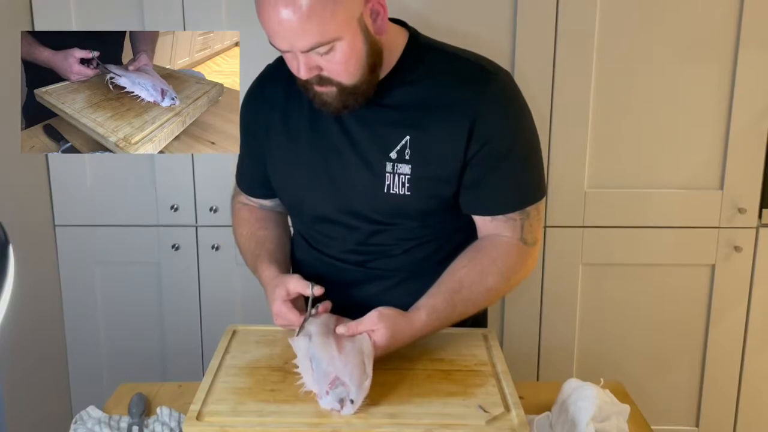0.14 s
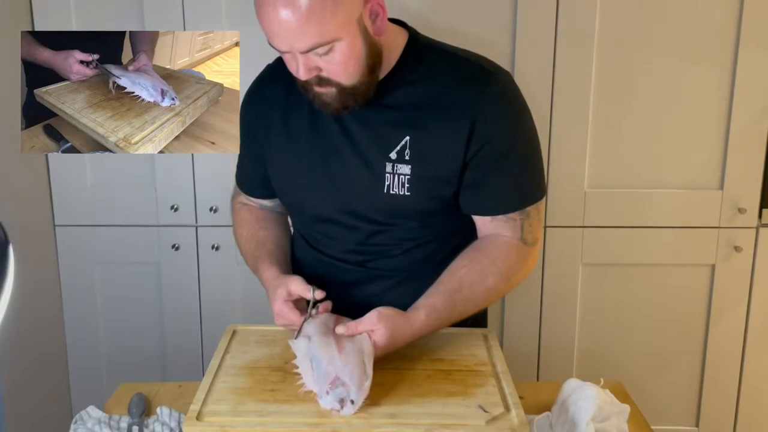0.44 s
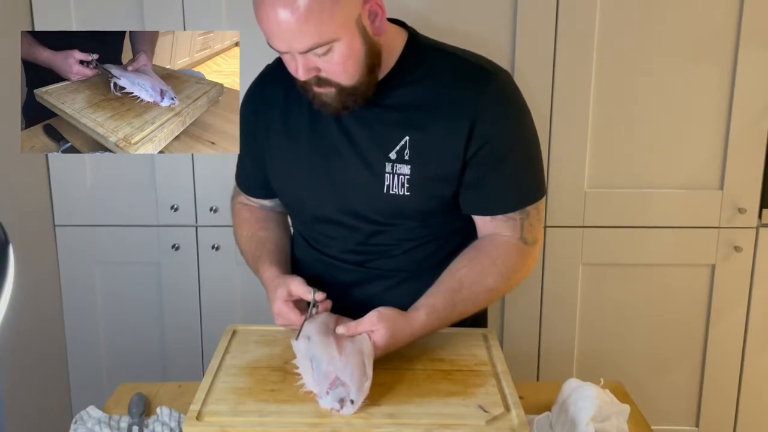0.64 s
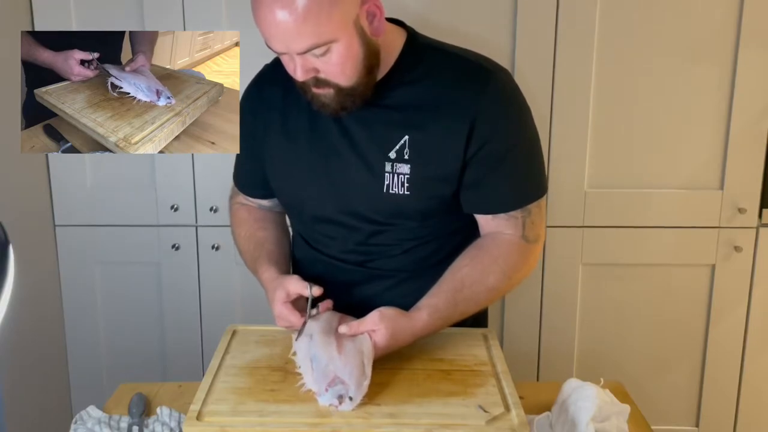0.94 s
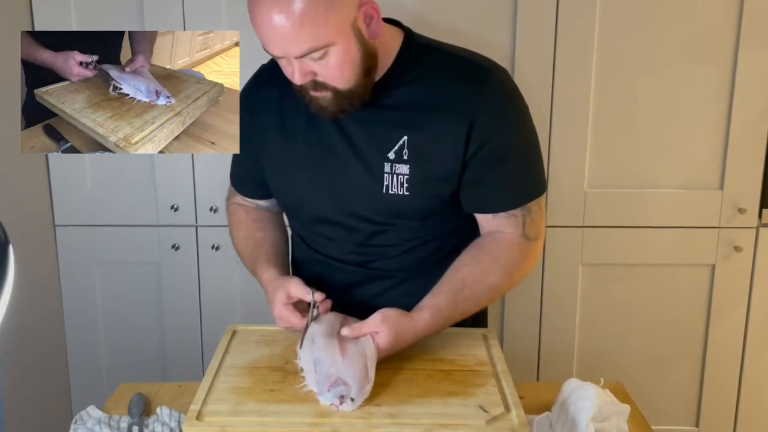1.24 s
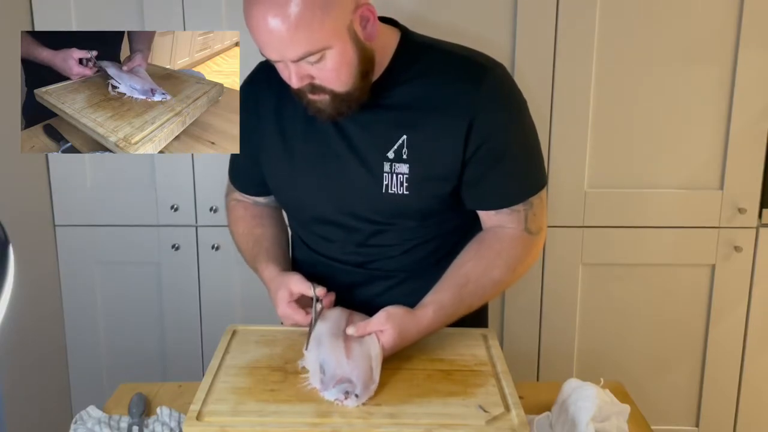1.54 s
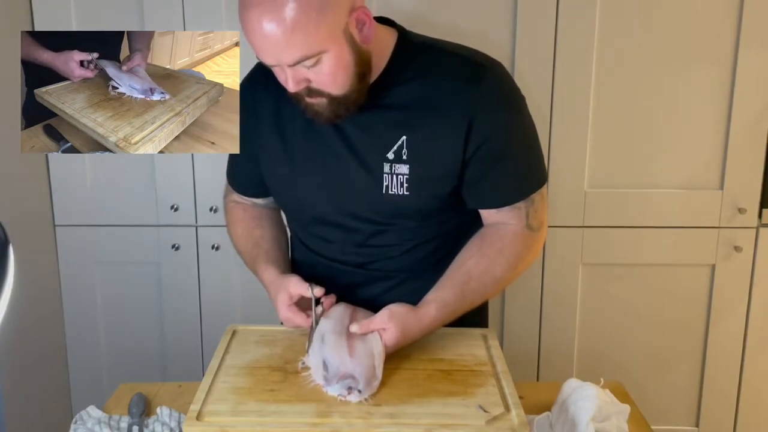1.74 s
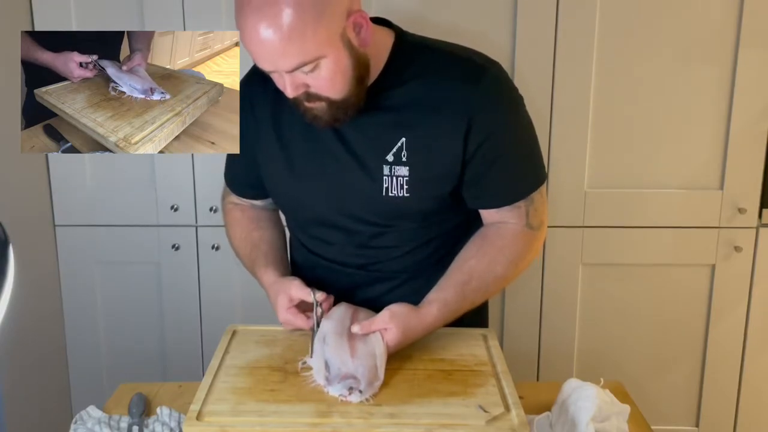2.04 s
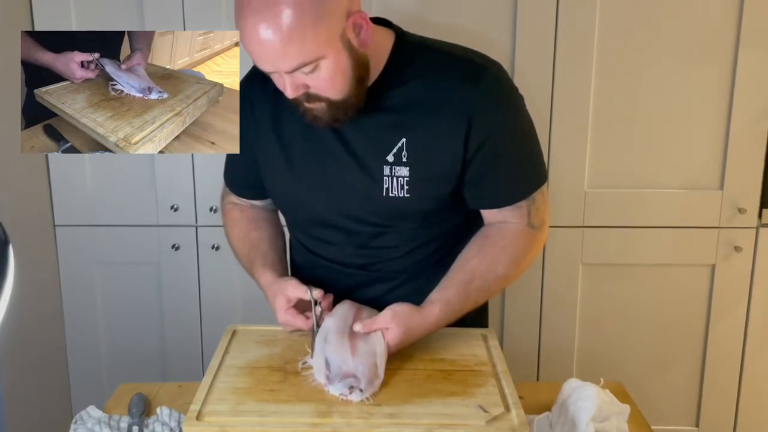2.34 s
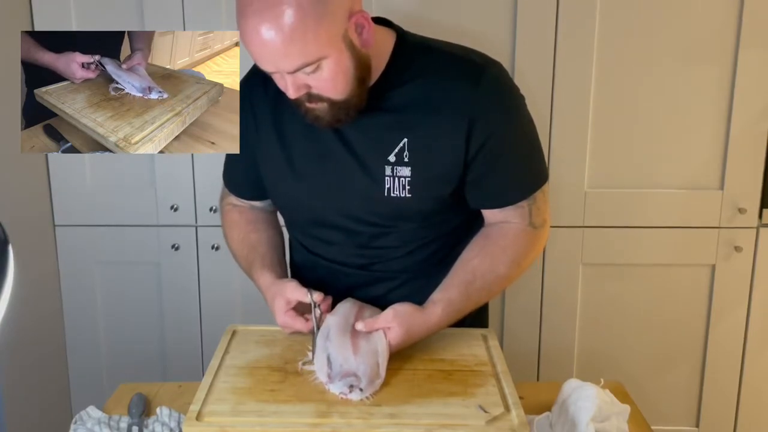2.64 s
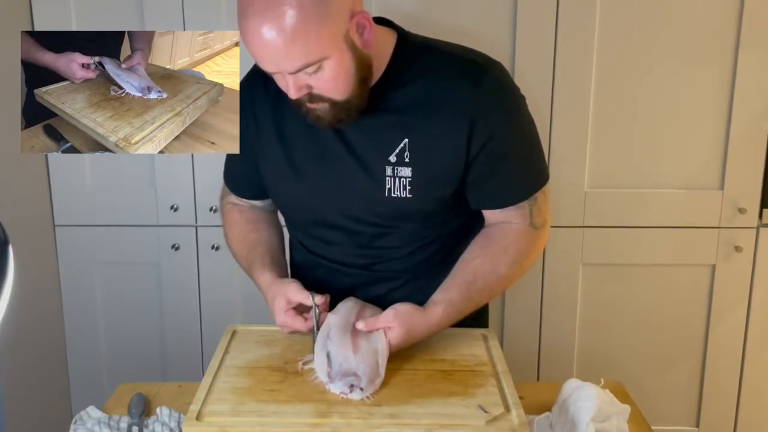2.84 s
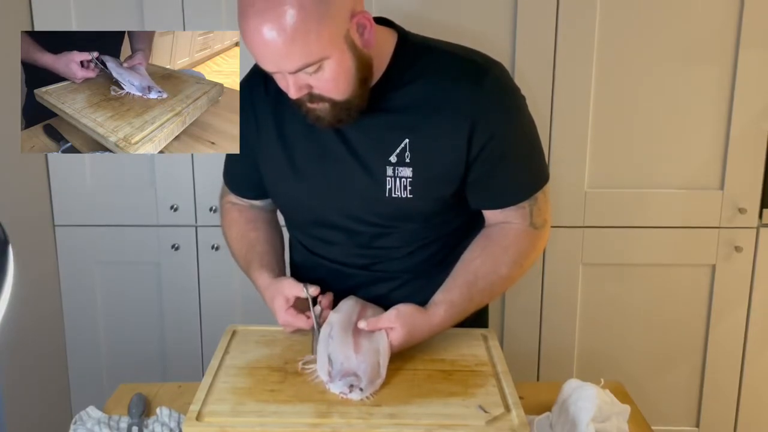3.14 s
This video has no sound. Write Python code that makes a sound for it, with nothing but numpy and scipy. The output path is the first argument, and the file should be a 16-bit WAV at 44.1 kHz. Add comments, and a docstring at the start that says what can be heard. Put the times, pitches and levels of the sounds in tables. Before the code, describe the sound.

Kitchen scissors snip crisply through fish fins, ending with a sharp metallic clack.

```python
"""Kitchen scissors cut through the fins of a fish on a wooden board, in four short runs of snips.
Each fin ray crunches between the blades; the last gives way and the blades clack shut, jolting the table.
The blades slide over wet skin and hands softly shift the fish.
A small hard kitchen rings after each cut, over a faint rumble, hiss and hum."""
import sys
import numpy as np
from scipy import signal
from scipy.fft import rfft, irfft
from scipy.io import wavfile

SR = 44100
rng = np.random.default_rng(int(sys.argv[2]) if len(sys.argv) > 2 else 0)


def file_out(sig):
    """Save sig as 16-bit WAV at sys.argv[1]."""
    # one column per channel
    cols = np.atleast_2d(sig).T
    # limit, then scale
    lim = np.clip(cols, -1, 1)
    pcm = np.round(lim * 32767).astype(np.int16)
    wavfile.write(sys.argv[1], SR, pcm)


N = 145530
BURST = N // 5  # samples in one burst of cracks
TIME = np.arange(N) / SR
FREQS, BURST_FREQS = np.fft.rfftfreq(2 * N, 1 / SR), np.fft.rfftfreq(2 * BURST, 1 / SR)


def amp(db):
    """Decibels to gain."""
    return 10 ** (np.asarray(db) / 20)


def unit(x):
    """Scales to rms 1."""
    return x / np.sqrt(np.mean(x ** 2) + 1e-20)


def read(points, hz):
    """Reads a curve on a log-frequency axis."""
    point_hz, value = np.transpose(points)
    return np.interp(np.log(hz + 1), np.log(point_hz + 1), value)


def add(mix, start, sound):
    """Mixes a sound in at a start time in seconds."""
    part = mix[max(round(start * SR), 0):][:len(sound)]
    part += sound[:len(part)]


def colour(x, gain):
    """Minimum-phase EQ with the given shape and unit power gain."""
    n = len(x)
    log_gain = np.log(np.maximum(unit(gain), 1e-5))
    phase = 2 * rfft(irfft(log_gain)[:n], 2 * n).imag
    return irfft(rfft(x, 2 * n) * np.exp(log_gain + 1j * phase))[:n]


def resonances(rows, freqs):
    """EQ curve of a set of steep-sided resonances."""
    peaks = (amp(2 * db) / (1 + ((freqs - hz) / (0.69 * width)) ** 2) ** 2 for hz, width, db in rows)
    return np.sqrt(sum(peaks))


def swell(t, rise, fade):
    """Straight rise, then exponential fade."""
    return np.minimum(t / rise, 1) * np.exp(-np.maximum(t - rise, 0) / fade)


def crackle(rise, fade, cracks_per_s=12000, spread_db=1.5):
    """A burst of tiny cracks of uneven size, partly evened out in colour."""
    size = amp(spread_db * np.minimum(rng.exponential(1, BURST), 4)) * rng.choice([-1, 1], BURST)
    envelope = swell(TIME[:BURST], rise, fade)
    cracks = envelope * size * (rng.random(BURST) < cracks_per_s / SR)
    spectrum = rfft(cracks, 2 * BURST)
    evened = spectrum / (abs(spectrum) + 0.99 * abs(spectrum).mean() + 1e-12)
    return unit(irfft(evened)[:BURST]) * np.sqrt(np.mean(envelope ** 2))


# Tone of the noise floor. Each row: frequency in Hz, relative level in dB.
FLOOR = [(8, -6), (22, 2.5), (45, -3), (60, 0), (80, -2.5), (105, 0), (170, -6.5), (260, -10), (400, -15),
         (600, -18.5), (1300, -20), (2400, -23.5), (5000, -25), (8000, -24), (12000, -20.5), (15700, -21.5),
         (16200, -43)]


def background(floor_db=-62.5, hum_hz=210.3, hum_width_hz=10.7, hum_db=-75):
    """Room rumble, microphone hiss and a faint wavering hum."""
    floor_noise, hum_noise = rng.standard_normal((2, N))
    floor = colour(floor_noise, amp(read(FLOOR, FREQS)))
    hum = colour(hum_noise, resonances([(hum_hz, hum_width_hz, 0)], FREQS))
    return amp(floor_db) * unit(floor) + amp(hum_db) * unit(hum)


# Fin rays snapping, then blades sliding over wet skin. Each row: start, rise and fade in seconds,
# crunch pitch in Hz, then the levels of crunch, crisp top and blade ring in dB.
SNIPS = [(0.4002, 0.003, 0.0034, 2110, -46, -61, -46.5), (.516, 0.0024, 0.0098, 1900, -52, -51.5, -54),
         (.547, 0.00054, .002, 1730, -44, -47, -60), (.551, 0.00054, 0.0013, 2150, -52, -41, -58),
         (0.554, 0.0012, 0.012, 1960, -54, -50, -70), (1.1577, 0.0011, 0.0023, 1900, -65, -67, -61),
         (1.1642, 0.0014, 0.0067, 1880, -51, -55, -52), (1.212, 0.0061, 0.0054, 2040, -50.5, -50.5, -54),
         (1.2678, 0.0037, 0.0064, 1940, -54.5, -46.5, -74), (1.3141, .001, .005, 2060, -51, -49, -76),
         (1.325, .003, 0.0048, 2500, -53, -57, -75), (1.944, 0.0063, 0.0052, 1940, -60.5, -53.5, -61),
         (2.003, .003, 0.0094, 2200, -67, -54.5, -63), (2.012, 0.00092, 0.0056, 2520, -60, -47, -70),
         (2.069, 0.00067, .002, 2200, -72, -51, -76), (2.088, 0.011, 0.011, 2284, -66, -51.5, -62),
         (2.659, 0.0089, 0.029, 1590, -65, -59, -68), (2.72, 0.0027, .005, 1700, -58, -53, -62),
         (2.7968, 0.0071, 0.0057, 2750, -39.5, -41.5, -53)]
SLIDES = [(0, 0.033, 0.067, 2330, -69, -72, -74), (.8, 0.049, 0.12, 2100, -73, -84, -92),
          (2.12, 0.032, .035, 2250, -68, -62.5, -82)]
# EQ curves for those three layers. Each row: frequency in Hz, relative level in dB.
CRUNCH_EQ = [(100, -26), (400, -9.5), (640, -14.5), (900, -8), (1280, -4), (1650, -4), (2200, 1.5),
             (2650, -3.5), (3300, -9.5), (4300, -16), (8000, -13), (16000, -24)]
CRISP_EQ = [(200, -25), (1500, -7.5), (3300, -1), (4600, -9), (7000, -4.5), (9800, -2), (12000, -6),
            (13200, -5), (16000, -10)]
RING_EQ = [(300, -58), (5000, -31.5), (6000, -1), (6500, -4), (7000, 0.5), (7700, -19), (9500, -8.5),
           (11000, -15), (16000, -29)]
CRUNCH_HZ = 2110  # the pitch at which the crunch curve is unshifted
# Narrow resonances of the open scissors. Each row: centre in Hz, width in Hz, relative level in dB.
OPEN_SCISSORS = [(1280, 190, 1.5), (1606, 74, 4.5), (2200, 93, 1.5), (6580, 200, -0.5)]


def cutting():
    """Cracking fin and sliding blades give a dull crunch, a crisp top and a ring of steel."""
    cuts = np.zeros(N)
    crisp = unit(amp(read(CRISP_EQ, BURST_FREQS)))
    steel = unit(amp(read(RING_EQ, BURST_FREQS)))
    for start, rise, fade, hz, crunch_db, crisp_db, ring_db in SNIPS + SLIDES:
        crunch = unit(amp(read(CRUNCH_EQ, BURST_FREQS * CRUNCH_HZ / hz)))
        power = (amp(crunch_db) * crunch) ** 2 + (amp(crisp_db) * crisp) ** 2 + (amp(ring_db) * steel) ** 2
        add(cuts, start, np.sqrt(power.mean()) * colour(crackle(rise, fade), np.sqrt(power)))
    return colour(cuts, np.hypot(1, resonances(OPEN_SCISSORS, FREQS)))


# Early reflections. Each row: delay in seconds, level in dB against the direct sound.
ECHOES = [(.0011, -16.5), (.0032, -15.5), (.0074, -8.5), (0.0206, -19.5)]


def with_echoes(x):
    """The direct sound and its first bounces off board, body and cupboards."""
    out = x.copy()
    for delay, db in ECHOES:
        add(out, delay, amp(db) * x)
    return out


# The kitchen's reverb time. Each row: frequency in Hz, seconds to fall 60 dB.
ROOM_T60 = [(150, 0.43), (450, 0.51), (1000, 0.75), (2200, 0.89), (4000, 0.74), (7000, 0.65), (11000, 0.55),
            (16000, 0.32)]


def kitchen(x, predelay_s=0.0041, build_s=0.0019):
    """Dense reflections off hard walls, each band dying at its own speed."""
    hz, t, noise = signal.stft(rng.standard_normal(SR), SR, nperseg=256)
    decay = amp(-60 * t / read(ROOM_T60, hz)[:, None])
    tail = signal.istft(noise * decay, SR, nperseg=256)[1][:SR]
    tail *= np.clip((TIME[:SR] - predelay_s) / build_s, 0, 1)
    return signal.fftconvolve(x, tail / np.linalg.norm(tail))[:N]


# Hand moves. Each row: start, rise and fade in seconds, level in dB.
RUBS = [(.55, 0.33, .13, -69.5), (1.0, 0.17, .25, -69), (1.85, 0.35, .22, -74.5)]
# Their dull tone. Each row: centre in Hz, width in Hz, relative level in dB.
RUB_TONE = [(310, 106, 2.5), (600, 58, -3)]


def handling():
    """Soft rubbing as hands shift the fish on the board."""
    envelope = np.zeros(N)
    for start, rise, fade, db in RUBS:
        add(envelope, start, amp(db) * swell(TIME, rise, fade))
    return envelope * unit(colour(rng.standard_normal(N), resonances(RUB_TONE, FREQS)))


# Deep thuds. Each row: start in seconds, pitch in Hz, level in dB, rise and fade in seconds.
JOLTS = [(1.969, 44.3, -58, 0.027, 0.15), (2.839, 42.8, -44, 0.038, 0.085), (2.988, 41.9, -50, .05, 0.18)]


def table_shudder():
    """The table shudders at its lowest mode when the hands push or jolt it."""
    out = np.zeros(N)
    for start, hz, db, rise, fade in JOLTS:
        add(out, start, amp(db) * swell(TIME, rise, fade) * np.sin(2 * np.pi * hz * TIME))
    return out


# Steel hitting steel. Each row: start, rise and fade in seconds, level in dB.
CLACKS = [(2.8322, 0.00027, 0.0018, -33), (2.8344, 0.0017, 0.0023, -17), (2.838, 0.00067, 0.0021, -31.5),
          (2.8429, 0.00027, 0.0013, -27.5)]
# Broad resonances of the shut scissors. Each row: centre in Hz, width in Hz, relative level in dB.
SHUT_SCISSORS = [(435, 126, -4.5), (1135, 106, -7), (1400, 304, -1.5), (2220, 830, -8), (3790, 610, -0.5),
                 (4630, 930, -6), (6910, 1020, 3), (9000, 650, 1), (10330, 740, 4.5), (11500, 910, -2),
                 (13100, 1140, 0), (14000, 460, 5), (15300, 1500, 2.5)]
# The blades' shimmer and the board's knock. Each row: pitch in Hz, level in dB, seconds to fall 60 dB.
BLADE_MODES = [(1370, -53, 0.35), (3460, -56, 0.34), (6540, -50, .4), (6530, -53, 0.4), (6730, -60, 0.5),
               (9168, -54, .3), (9986, -54, 0.66), (10215, -45, 0.51), (10500, -51, 0.46),
               (13292, -53, 0.26), (14800, -47, .33), (14417, -51, .33), (14997, -53, 0.36),
               (15346, -49, .33)]
BOARD_MODES = [(138, -62, 0.34), (255, -61, 0.32), (408, -54, 0.17)]


def shutting(reverb_db=-5):
    """The blades slam together and chatter; the hardest blow leaves steel and board ringing."""
    out = np.zeros(N)
    body = resonances(SHUT_SCISSORS, BURST_FREQS)
    for start, rise, fade, db in CLACKS:
        blow = amp(db) * colour(crackle(rise, fade), body)
        add(out, start, with_echoes(blow))
        add(out, start, amp(reverb_db) * kitchen(blow))
    hardest_start = max(CLACKS, key=lambda row: row[3])[0]
    for hz, db, t60 in BLADE_MODES + BOARD_MODES:
        add(out, hardest_start, amp(db - 60 * TIME / t60) * np.sin(2 * np.pi * hz * TIME))
    return out


def scene(cut_reverb_db=-4.5):
    """The mono mix: scissors in the kitchen, with hands, table and room tone underneath."""
    cuts = cutting()
    cuts_in_room = with_echoes(cuts) + amp(cut_reverb_db) * kitchen(cuts)
    return (cuts_in_room + shutting() + handling() + table_shudder() + background())[None]


def record(dry, cutoff_hz=15900):
    """A steep low-pass takes off the very top."""
    lowpass = signal.firwin(511, cutoff_hz, window=("kaiser", 8), fs=SR)
    return signal.oaconvolve(dry, lowpass[None], "same")


dry = scene()
out = record(dry)
file_out(out)
```